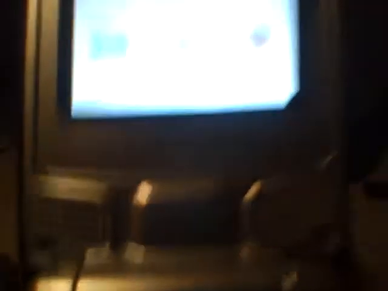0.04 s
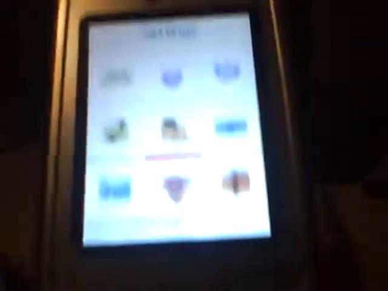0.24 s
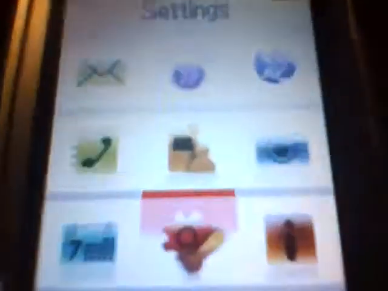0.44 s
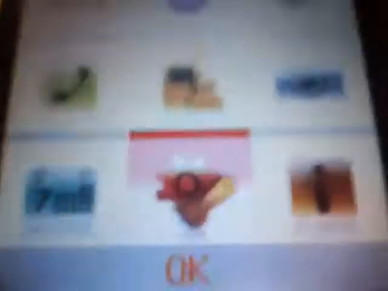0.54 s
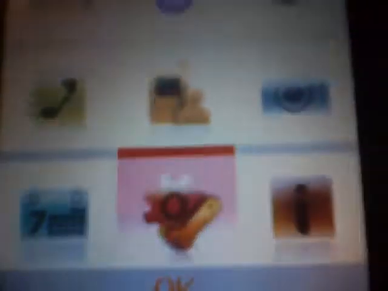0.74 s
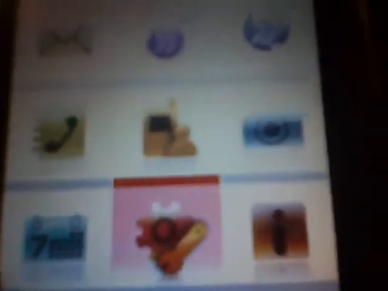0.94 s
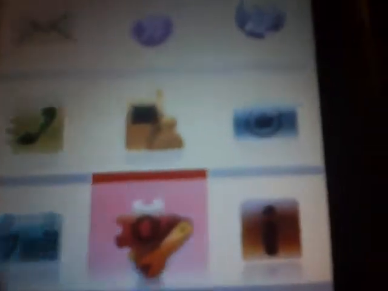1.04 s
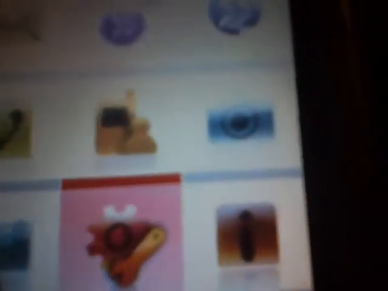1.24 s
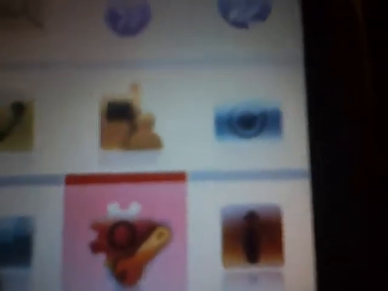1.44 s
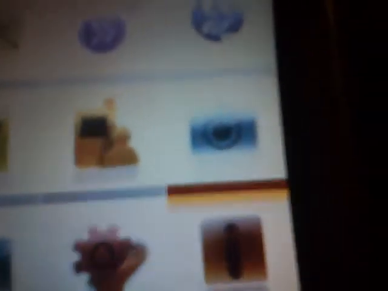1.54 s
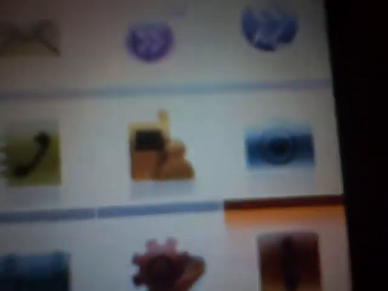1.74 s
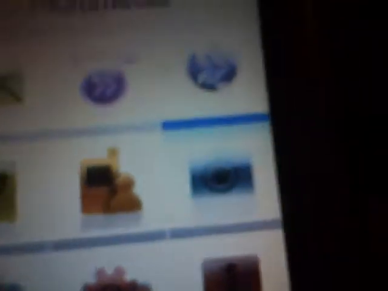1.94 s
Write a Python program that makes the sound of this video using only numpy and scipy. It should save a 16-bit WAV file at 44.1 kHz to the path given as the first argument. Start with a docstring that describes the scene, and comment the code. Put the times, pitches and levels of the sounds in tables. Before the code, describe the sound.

A phone handled close up, with dry microphone pops, soft crackle and one key click.

```python
"""A few dry pops, like a loose contact in a small microphone, stand out in a quiet room.
A phone is handled close by: one plastic key clicks and rings briefly, the grip shifts
in short spells of soft low crackle as fingers stick and slip, and the hand bumps the case.
A faint rumble and an even hiss lie underneath."""
import sys
import numpy as np
from scipy import signal
from scipy.fft import rfft, irfft
from scipy.io import wavfile
from scipy.ndimage import uniform_filter1d

SR = 44100
rng = np.random.default_rng(int(sys.argv[2]) if len(sys.argv) > 2 else 0)


def waveform_to_disk(signal):
    """Save audio, clipped to [-1, 1], as 16-bit WAV at the path in sys.argv[1]."""
    frames = np.transpose(np.atleast_2d(signal))
    scaled = np.clip(frames, -1, 1) * 32767
    samples = np.round(scaled).astype(np.int16)
    wavfile.write(sys.argv[1], SR, samples)


N = 88200

# Breaks in the loose contact: start_s, open_ms, level_db
CONTACT_GAPS = [(0.2352, 4.706, 2), (1.2134, .16, 6), (1.2325, 0.17, 5.5), (1.2346, 0.031, 4.5),
                (1.2484, .16, 6)]


def contact_pops():
    """The contact opens and closes: a long gap thumps, a short one ticks."""
    steps = np.zeros(N)
    for start_s, open_ms, level_db in CONTACT_GAPS:
        add_push(steps, start_s, open_ms / 1000, undb(level_db))
    return input_stage(steps)


# Ring of the key and case: pitch_hz, level_db, t60_s
KEY_MODES = [(763, -0.5, 0.015), (918, -3, 0.031), (1060, -17, 0.0079), (1560, -7, 0.015),
             (2330, -8, 0.011), (2540, 2, 0.0091), (3630, -6, 0.01), (3810, -3, 0.011), (6150, -14, 0.013),
             (7500, -17, 0.0067)]


def key_click(start_s=0.5651, attack_s=0.0012):
    """The key snaps down in about a millisecond and sets off a short plastic ring."""
    t = np.maximum(np.arange(N) / SR - start_s, 0)
    attack = np.sin(np.pi / 2 * np.minimum(t / attack_s, 1)) ** 2
    ring = sum(undb(level_db) * np.exp(-np.log(1000) * t / t60_s) * np.sin(2 * np.pi * pitch_hz * t)
               for pitch_hz, level_db, t60_s in KEY_MODES)
    return undb(-25.5) * attack * ring


# Spells in which the grip shifts: start_s, length_s, level_db
GRIP_SHIFTS = [(0.01, .035, -1.5), (0.06, 0.051, 1), (0.168, 0.052, -10), (0.282, .032, 2.5),
               (0.485, .028, -2), (0.538, 0.019, -1), (0.66, 0.02, 4), (0.713, 0.0073, 4.5),
               (0.756, 0.017, 1.5), (0.786, 0.046, 1.5), (0.872, 0.044, -5.5), (0.967, .028, 0),
               (1.045, .026, 4.5), (1.082, 0.046, 2), (1.143, .03, -1), (1.198, 0.015, 6),
               (1.316, 0.00963, 6), (1.338, .027, 1.5), (1.533, .037, 2), (1.643, 0.018, 7),
               (1.676, 0.079, 1.5), (1.801, 0.0073, -1), (1.845, 0.0073, 2.5), (1.891, .018, 2.5),
               (1.939, 0.0083, 3), (1.992, 0.0058, 2)]
# Tone of skin scraping on plastic: frequency_hz, level_db
SCRAPE_SPECTRUM = [(100, -12), (400, 3.5), (900, -2), (1500, -12), (3000, -25), (8000, -45)]


def grip_crackle(slips_per_s=125, slip_s=0.001276):
    """Fingers stick and slip on the case in uneven little pushes; each slip scrapes faintly."""
    pushes = np.zeros(N)
    for start_s, length_s, level_db in GRIP_SHIFTS:
        scatter = rng.standard_normal(size=(40, 3))
        slips = int(np.clip(round(length_s * slips_per_s), 1, len(scatter)))
        for k, (jitter, stretch, accent) in enumerate(scatter[:slips]):
            onset_s = start_s + length_s * (k + .5 + 0.255 * jitter) / slips
            push_s = slip_s * np.exp(0.406 * stretch)
            add_push(pushes, onset_s, push_s, undb(-35 + level_db + 1.5 * accent))
    crackle = one_pole(input_stage(pushes), 1800, "low")
    scrape_envelope = one_pole(pushes, 90, "low")
    return crackle + undb(-18.5) * scrape_envelope * noise(SCRAPE_SPECTRUM)


# Soft knocks of the hand on the case: start_s, length_ms, level_db, polarity
HAND_BUMPS = [(0.1333, 1.7, -34.5, 1), (0.176, 2.8, -34, -1), (0.5799, 2.14, -31.5, 1),
              (0.698, 2.63, -30, 1), (0.941, 2.1, -32.5, 1), (1.6596, 1.83, -28.5, -1),
              (1.9125, 2.9, -30, -1), (1.9217, 3.62, -30, 1)]


def hand_bumps():
    """Heavier pushes of the hand, cushioned into dull thuds."""
    pushes = np.zeros(N)
    for start_s, length_ms, level_db, polarity in HAND_BUMPS:
        add_push(pushes, start_s, length_ms / 1000, polarity * undb(level_db))
    thuds = one_pole(one_pole(pushes, 38, "high"), 326, "low")
    return one_pole(thuds, 1800, "low")


# Tone of the low rumble: frequency_hz, level_db
RUMBLE_SPECTRUM = [(20, -3.5), (60, -0.5), (130, -2.5), (300, -4), (600, -10), (1200, -16.5), (2500, -24.5),
                   (6000, -36)]
# Tone of the microphone hiss: frequency_hz, level_db
HISS_SPECTRUM = [(100, 6.5), (2000, 0), (4000, -1), (8000, -2.5), (12000, -3), (16000, -5)]


def background():
    """A faint flickering rumble under steady microphone hiss."""
    rumble = noise(RUMBLE_SPECTRUM) * undb(-55.5 + 1.5 * drift(rate_hz=39.76))
    hiss = noise(HISS_SPECTRUM) * undb(-61)
    return rumble + hiss


def input_stage(x):
    """The microphone input blocks slow drift and rounds each step into a thump that swings back."""
    for cutoff_hz in (107, 29):
        x = one_pole(x, cutoff_hz, "high")
    return one_pole(x, 216.4, "low")


def undb(db):
    """Decibels to gain."""
    return 10 ** (np.asarray(db) / 20)


def one_pole(x, cutoff_hz, kind):
    """Gentle low- or high-pass."""
    pole = np.exp(-2 * np.pi * cutoff_hz / SR)
    low = signal.lfilter([1 - pole], [1, -pole], x)
    return low if kind == "low" else x - low


def add_push(out, start_s, length_s, height):
    """Adds a flat-topped push, with edges shared between samples."""
    rise, fall = start_s * SR, (start_s + length_s) * SR
    i = np.arange(max(int(rise), 0), min(int(fall) + 2, N))
    out[i] += height * (np.clip(i - rise, 0, 1) - np.clip(i - fall, 0, 1))


def noise(spectrum):
    """Noise of rms 1 with the given spectrum."""
    frequency_hz, level_db = np.array(spectrum, float).T
    bins_hz = np.maximum(np.fft.rfftfreq(N, 1 / SR), 1)
    gain = undb(np.interp(np.log(bins_hz), np.log(frequency_hz), level_db))
    shaped = irfft(rfft(rng.standard_normal(N)) * gain, N)
    return shaped / shaped.std()


def drift(rate_hz):
    """Smooth random drift with a spread of 1."""
    hold = int(SR / rate_hz)
    steps = np.repeat(rng.standard_normal(N // hold + 1), hold)
    smooth = uniform_filter1d(uniform_filter1d(steps, hold), hold)[:N]
    return smooth / smooth.std()


def scene():
    """All sources at one close microphone."""
    return (background() + contact_pops() + key_click() + grip_crackle() + hand_bumps())[None]


def record(dry):
    """A steep low-pass cuts the very top of the treble."""
    top_hz = 16100
    return signal.sosfilt(signal.ellip(10, .1, 70, top_hz, fs=SR, output="sos"), dry)


dry = scene()
out = record(dry)
waveform_to_disk(out)
```